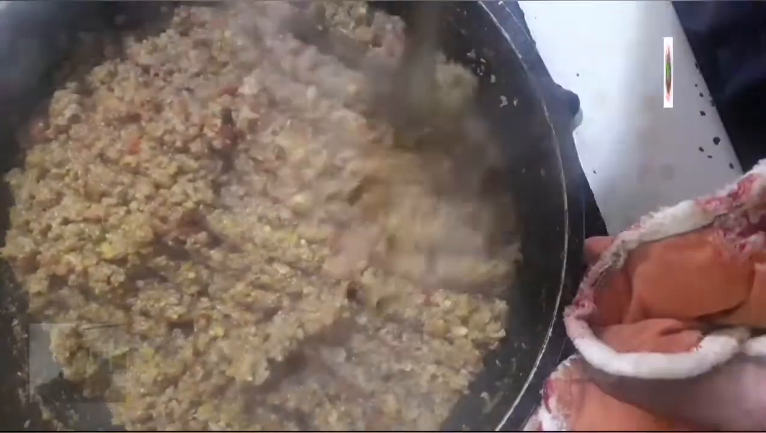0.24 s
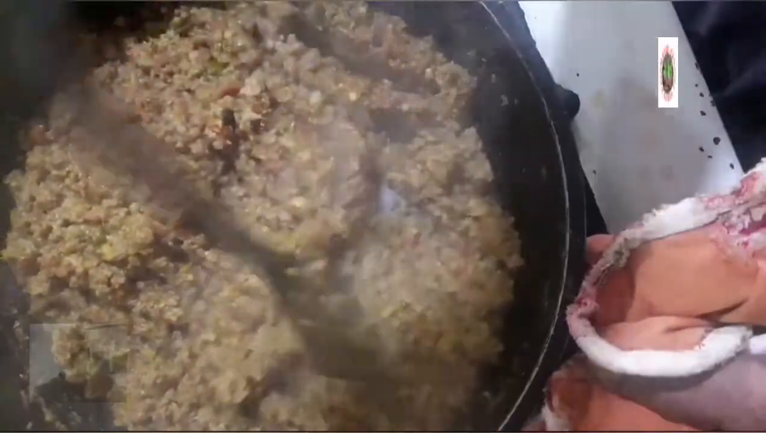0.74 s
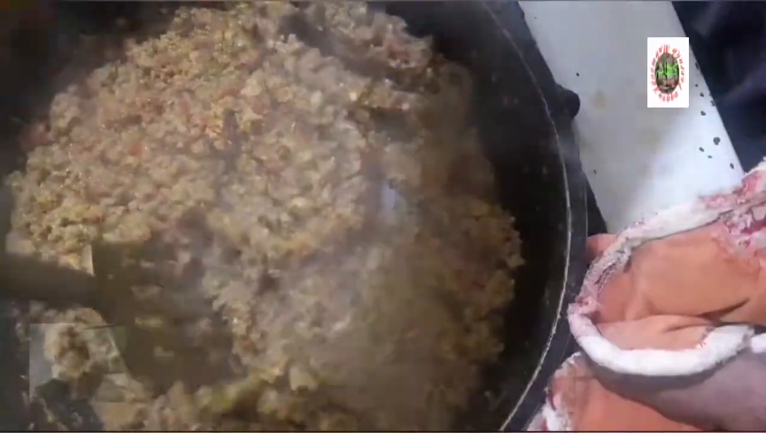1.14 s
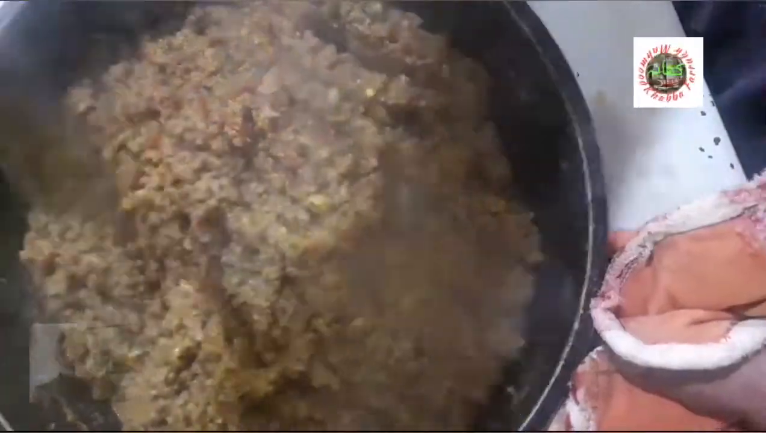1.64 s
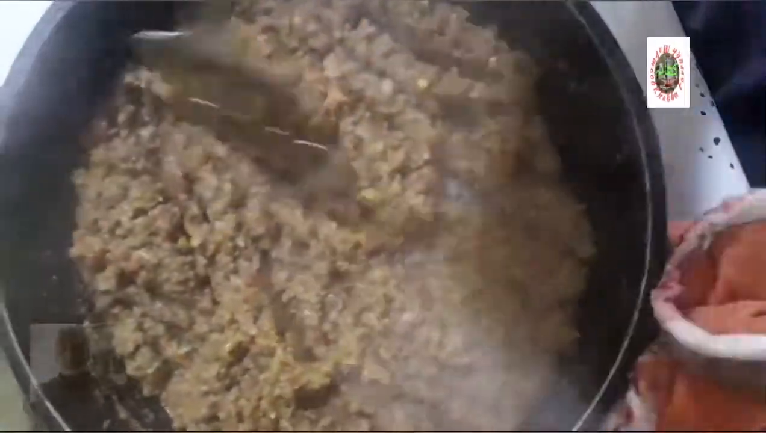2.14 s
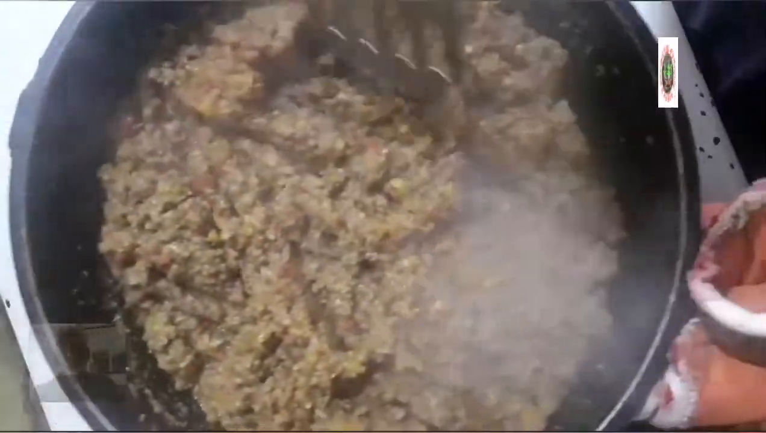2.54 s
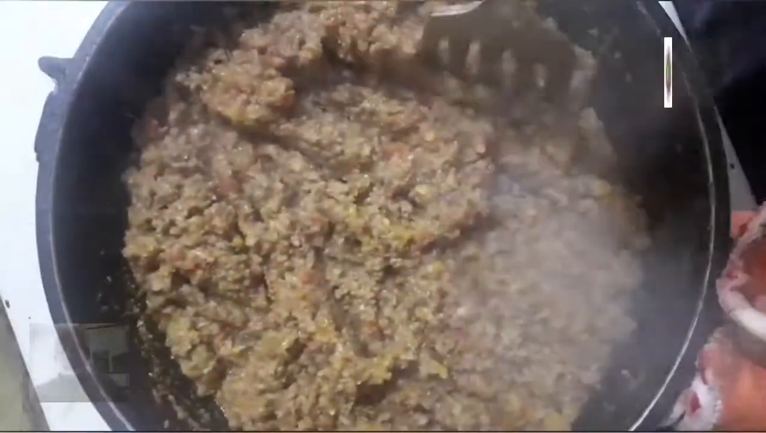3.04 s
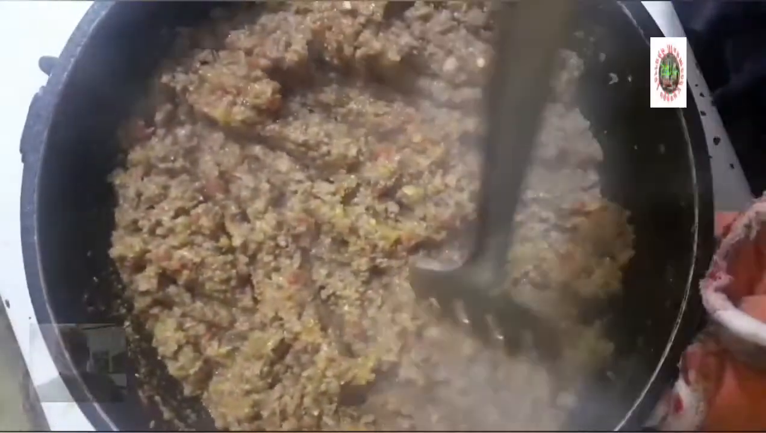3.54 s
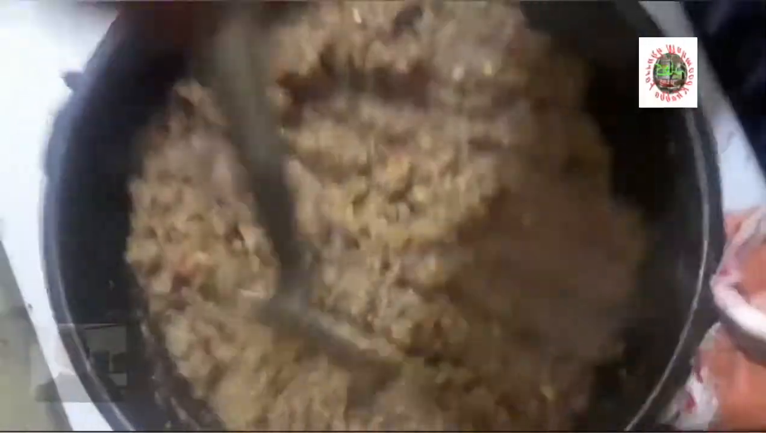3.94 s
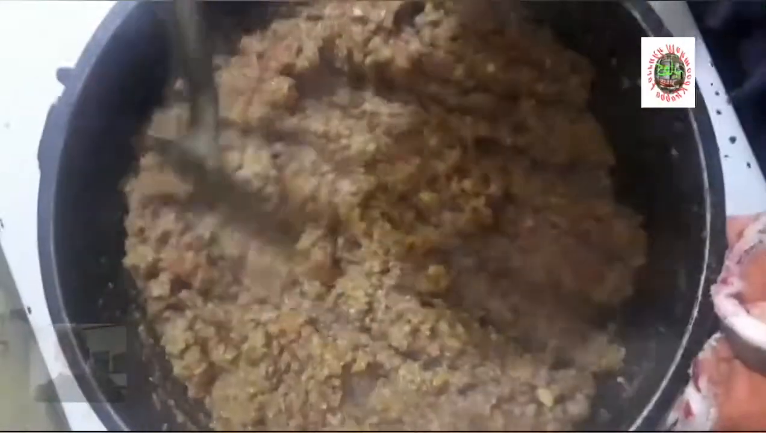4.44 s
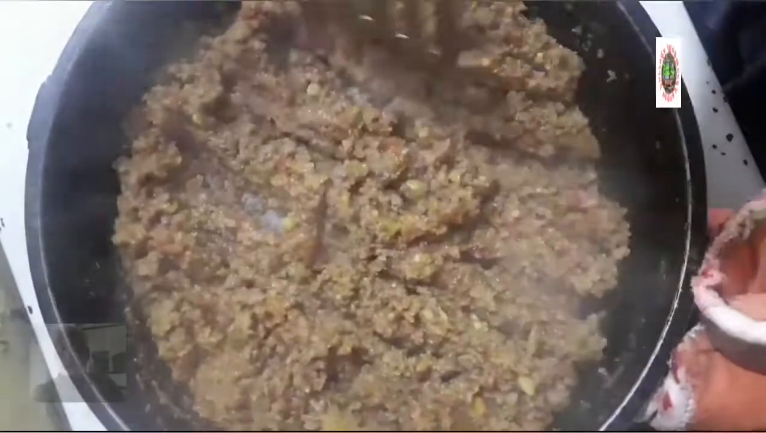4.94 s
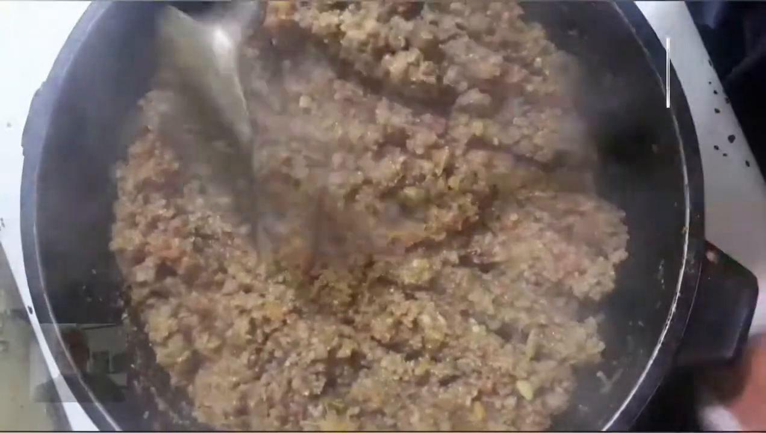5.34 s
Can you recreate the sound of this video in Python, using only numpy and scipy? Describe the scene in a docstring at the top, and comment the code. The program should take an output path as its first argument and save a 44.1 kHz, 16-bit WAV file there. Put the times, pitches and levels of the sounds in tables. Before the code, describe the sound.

Rapid, hard clacks of a steel spatula on an iron pan ring briefly while mince sizzles quietly in a small kitchen.

```python
"""A hard clack of steel on iron, then about five a second: a slotted spatula chops through frying mince.
The stereo microphone is close to the heavy pan, in a small bare kitchen that answers every blow.
Blade and pan ring briefly, the edge skids, and some hard blows rock the pan on the stove.
Underneath, the wet meat squelches and the fat sizzles softly."""
import sys
import numpy as np
from scipy import signal
from scipy.fft import rfft, irfft
from scipy.io import wavfile
from scipy.ndimage import uniform_filter1d

SR = 44100
rng = np.random.default_rng(int(sys.argv[2]) if len(sys.argv) > 2 else 0)


def int16_out(signal):
    """Quantize to a 16-bit WAV file."""
    q = np.round(np.clip(np.atleast_2d(signal).T, -1, 1) * 32767)
    wavfile.write(sys.argv[1], SR, q.astype(np.int16))


N = 247401


def from_db(db):
    """Decibels to gain."""
    return 10 ** (np.asarray(db) / 20)


def unit(x):
    """Scaled to an energy of one."""
    return x / np.sqrt(np.sum(x ** 2) + 1e-20)


def rms_one(x):
    """Scaled to an rms of one."""
    return unit(x) * np.sqrt(x.size)


def at_hz(points, hz):
    """Reads a table on a log-frequency axis."""
    known_hz, values = np.transpose(points)
    return np.interp(np.log(hz + 1e-3), np.log(known_hz), values)


def seconds(length):
    """A time axis."""
    return np.arange(int(length * SR)) / SR


def dying(t, t60):
    """Falls by 60 dB in t60 seconds."""
    return np.exp(-np.log(1000) * t / t60)


def bump(x, width):
    """A bell curve of height one around zero."""
    return np.exp(-(x / width) ** 2)


def add(track, s, sound):
    """Lays a sound into the track at s seconds."""
    start = round(s * SR)
    track[start:start + len(sound)] += sound[:N - start]


def coloured(x, points):
    """Causal (minimum-phase) filter through the given (Hz, dB) points."""
    size = 2048
    gain = from_db(at_hz(points, np.arange(size // 2 + 1) * SR / size))
    cepstrum = irfft(np.log(gain))
    cepstrum[1:size // 2] *= 2
    cepstrum[size // 2 + 1:] = 0
    return signal.fftconvolve(x, irfft(np.exp(rfft(cepstrum))))[:len(x)]


def high_passed(x, hz):
    """Falls by 12 dB an octave below hz."""
    return signal.sosfilt(signal.butter(2, hz, "high", fs=SR, output="sos"), x)


def even(x):
    """Smooths out deep notches in a burst's spectrum; energy one."""
    spectrum = rfft(x)
    return unit(irfft(spectrum / np.abs(spectrum) ** .5, len(x)))


def mode(t, hz, t60):
    """One struck resonance of energy one."""
    return unit(np.sin(2 * np.pi * hz * t) * dying(t, t60)) * rng.choice([-1, 1])


# The bare kitchen around the microphone. Each row: frequency in Hz, t60 in seconds.
KITCHEN_DECAY = [(150, 0.34), (400, 0.53), (1200, 0.37), (3500, 0.31), (8000, 0.27), (15000, 0.18)]
def kitchen(t, build_s=0.009, wall_s=0.021, wall_spread_s=0.013, wall_db=2.0):
    """Diffuse echoes that swell, peak with the nearest wall, and die sooner in the treble; energy one."""
    noise = rfft(rng.standard_normal(len(t)))
    hz = np.arange(len(t) // 2 + 1) * SR / len(t)
    centres, t60s = np.transpose(KITCHEN_DECAY)
    bands = [at_hz(np.column_stack([centres, row]), hz) for row in np.eye(len(centres))]
    tail = sum(irfft(noise * band, len(t)) * dying(t, t60) for band, t60 in zip(bands, t60s))
    wall = from_db(wall_db * bump(t - wall_s, wall_spread_s))
    return unit(tail * (1 - bump(t, build_s)) * wall)


def echoes(sound, t):
    """What the walls send back to the microphone."""
    return signal.fftconvolve(sound, kitchen(t))[:len(t)]


def with_room(sound, t, wet):
    """A ring with its echoes in the kitchen; energy one."""
    return unit(unit(sound) + wet * unit(echoes(sound, t)))


def bubbling(per_s, size_db):
    """Pops of uneven size at random moments; rms one."""
    sizes = from_db(size_db * np.minimum(rng.exponential(1, N), 5)) * rng.standard_normal(N)
    return rms_one(sizes * (rng.random(N) < per_s / SR))


# Tone of the hiss and of the simmer, close to the pan. Each row: frequency in Hz, gain in dB.
SIZZLE_SPECTRUM = [(500, 0), (1000, 0), (1700, 9), (2800, 5), (4000, 8), (7600, 6), (8400, -5),
                   (9800, -5.5), (11600, 1.5), (13500, -4.5), (15500, 0.5), (16200, -23)]
SIMMER_SPECTRUM = [(25, -39), (50, -20), (90, -2.5), (180, -5.5), (260, 0), (420, -3), (650, -12),
                   (1100, -11.5), (2500, -52), (8000, -63)]
# How briskly the meat fries. Each row: time in seconds, hiss level in dB, simmer level in dB.
FRYING_LEVELS = [(0.0, -48.5, -47), (0.37, -50, -48.5), (1.48, -47.5, -44), (1.7, -50.5, -47),
                 (3.08, -52.5, -56), (3.77, -52, -52), (4.28, -51.5, -50.5), (4.69, -49.5, -45.5),
                 (5.34, -53, -53), (5.61, -52.5, -50)]
def frying(simmer_trim_db=-2.0):
    """Countless steam bursts merge into a smooth hiss, while juice simmers deep in the meat."""
    s, *levels = np.transpose(FRYING_LEVELS)
    sizzle_db, simmer_db = [np.interp(np.arange(N) / SR, s, level) for level in levels]
    sizzle = rms_one(coloured(rng.standard_normal(N), SIZZLE_SPECTRUM))
    simmer = rms_one(coloured(bubbling(per_s=900, size_db=-1.5), SIMMER_SPECTRUM))
    return from_db(sizzle_db) * sizzle + from_db(simmer_db + simmer_trim_db) * simmer


# Wet meat squeezed under the blade. Each row: start in seconds, level in dB, middle pitch in Hz.
MEAT_SQUELCHES = [(1.179, -30, 610), (1.37, -27.5, 690), (1.514, -28.5, 370), (1.543, -30.5, 457),
                  (1.56, -40, 366), (4.671, -43, 656), (5.059, -60, 644)]
def squelches(length_s=0.0119, cycles=11, spread=0.3, room_db=-6, count=12):
    """A handful of wet pockets pop, each ringing for a few cycles."""
    out, t = np.zeros(N), seconds(0.23)
    for s, db, hz in MEAT_SQUELCHES:
        delays = rng.random(count) * length_s
        pitches = hz * np.exp(spread * np.linspace(-2, 2, count))
        for delay, pitch in zip(delays, pitches):
            pop = mode(t, pitch, cycles / pitch) * from_db(db) * np.sqrt(length_s * SR / count)
            add(out, s + delay, pop + from_db(room_db) * echoes(pop, t))
    return out


# The pan against the stove beneath it.
# Each row: time of the peak in seconds, level in dB, pitch in Hz, half length in seconds.
PAN_KNOCKS = [(2.0466, -17, 146, 0.0033), (3.4055, -36, 110, 0.0072), (3.777, -30, 129, 0.0043),
              (4.43, -45, 110, 0.0059), (4.817, -13, 135, 0.0029)]
def knocks(room_db=-12):
    """The whole pan bounces once on its support: a low thud of about one cycle."""
    out, t = np.zeros(N), seconds(.5)
    for s, db, hz, half_s in PAN_KNOCKS:
        lead = 2 * half_s   # the push builds up before its peak
        thud = -from_db(db) * np.cos(2 * np.pi * hz * (t - lead)) * bump(t - lead, half_s)
        echo = coloured(echoes(thud, t), [(40, -6), (160, -10.5)])
        add(out, s - lead, thud + from_db(room_db) * echo)
    return out


# Skids across the floor of the pan.
# Each row: start in seconds, length in seconds, level in dB, squeak pitch in Hz.
EDGE_GRAZES = [(0.225, 0.02, -20.5, 4550), (0.407, 0.0081, -32, 5880), (1.672, 0.0092, -23.5, 4570),
               (2.218, 0.0067, -33, 7500), (3.179, 0.012, -33, 6900), (3.588, 0.0035, -16, 5060),
               (4.417, 0.0029, -30, 7300)]
def grazes(squeak_db=-2, room_db=-6, skid_s=.0035, skid_db=-20, skid_hz=6400):
    """The sliding edge hisses and briefly sets a blade mode squeaking."""
    out, t = np.zeros(N), seconds(.5)
    hiss_spectrum = [(300, -5), (4500, -11), (8000, -14.5), (16000, -15)]
    # every blow also skids a little just before it bites
    skids = [(s - skid_s, skid_s, db + skid_db, skid_hz * rng.uniform(0.8, 1.15)) for s, db, *_ in BLOWS]
    for s, length, db, hz in EDGE_GRAZES + skids:
        hiss = rms_one(coloured(rng.standard_normal(len(t)), hiss_spectrum))
        squeak = from_db(squeak_db) * np.sin(2 * np.pi * hz * t)
        stroke = np.sin(np.pi * np.minimum(t / length, 1))
        rub = from_db(db) * stroke * (0.5 * hiss + squeak)
        add(out, s, rub + from_db(room_db) * echoes(rub, t))
    return out


# The blade sings on above the meat. Each row: start in seconds, pitch in Hz, level in dB, t60 in seconds.
BLADE_REBOUNDS = [(3.571, 3350, -37, 0.19), (3.775, 3440, -44, 0.19), (3.954, 3410, -39, 0.17),
                  (4.4183, 4560, -32.5, 0.23), (4.421, 4130, -51, 0.24), (4.419, 1520, -40, 0.047),
                  (5.403, 2850, -48, 0.36), (5.4053, 3400, -33, 0.077), (5.4045, 4860, -43, 0.21)]
def rebounds(split=0.0187, twin_db=-2, room_db=1):
    """Lifted free, the blade is hardly damped; its slots pair the modes, so they beat."""
    out, t = np.zeros(N), seconds(0.71)
    for s, hz, db, t60 in BLADE_REBOUNDS:
        twin = from_db(twin_db) * np.sin(2 * np.pi * hz * (1 - split) * t)
        ring = from_db(db) * (np.sin(2 * np.pi * hz * t) + twin) * dying(t, t60)
        add(out, s, ring + from_db(room_db) * echoes(ring, t))
    return out


# The heavy pan's modes. Each row: frequency in Hz, relative level in dB, t60 in seconds.
PAN_MODES = [(166.1, -30, 0.88), (245.5, -22, 0.26), (365, -19.5, 0.23), (398.6, -20.5, 0.51),
             (476, -21.5, 0.36), (832.5, -17.5, 0.063), (934, -24, 0.43), (949, -26.5, 0.3),
             (1047, -19.5, 0.31), (1215, -32, 1), (1427, -20.5, 0.44), (1840, -22, 0.14),
             (2146, -23.5, 0.19), (3066, -22.5, 0.051), (4260, -66, 0.15), (4830, -39, 0.21),
             (5870, -30, 0.04), (7150, -48, 0.11)]
def pan_ring(t, trim_db=-1, vary_db=2.0, detune=0.0072):
    """The iron rings; the pressing blade and shifting meat nudge each mode's strength and pitch."""
    ring = 0
    for hz, db, t60 in PAN_MODES:
        strength, load = rng.standard_normal(2)
        ring += from_db(db + trim_db + vary_db * strength) * mode(t, hz * (1 + detune * load), t60)
    return ring


# Where the spatula presses on the pan. Each row: mode frequency in Hz, relative level in dB.
PRESSED_MODES = [(917, -19), (1430, -18.5), (1865, -18.5), (2135, -19.5), (3210, -16), (3370, -17.5),
                 (3990, -14.5), (4180, -19), (4515, -16.5), (5650, -20.5), (7550, -12)]
def contact_rings(t, t60, wet, trim_db=-1, spot_db=3, detune=0.0072):
    """Short, strong rings, weighted anew by each spot and angle of contact."""
    rings = 0
    for hz, db in PRESSED_MODES:
        spot, load = rng.standard_normal(2)
        rings += from_db(db + trim_db + spot_db * spot) * mode(t, hz * (1 + detune * load), t60)
    return np.linalg.norm(rings) * with_room(rings, t, wet)


# The blade's upper resonances. Each row: frequency in Hz, height above the valleys in dB.
BLADE_PEAKS = [(4150, 0), (4570, 2), (5050, 6.5), (5630, 4), (6200, 6.5), (6620, 7.5), (7350, 9),
               (7700, 9.5), (8650, 0.5), (9500, 5.5), (10200, 8.5), (10800, 8), (11400, 9.5), (12420, 0),
               (12900, 0)]
def blade_colour(width_hz=130, vary_db=2):
    """Peaks and valleys of the steel blade, weighted anew by every grip and contact: (Hz, dB)."""
    hz = np.arange(40, 16500, 40)
    peaks = sum((db + vary_db * rng.standard_normal()) * bump(hz - centre, width_hz)
                for centre, db in BLADE_PEAKS)
    return np.column_stack([hz, peaks - uniform_filter1d(peaks, size=31)])


# Tone of an average clack at the microphone. Each row: frequency in Hz, gain in dB.
CLACK_SPECTRUM = [(30, -38), (70, -5), (120, -40.5), (170, -1.5), (420, 1), (560, 0.5), (760, -2),
                  (980, 3.5), (1170, 1.5), (1500, -2.5), (2650, -4), (3300, -1.5), (5200, 1), (7700, -6),
                  (8300, -4.5), (16000, -5.5)]
def clack(t, wet, rise_s=0.00078, tick_t60=0.0038, tick_db=8.0, crack_t60=0.0086,
          blade_t60=0.079, blade_db=-10):
    """Steel hits iron: a tick, a crack, the blade's crowded modes and the room; energy one."""
    room = wet * kitchen(t)
    rise = 1 - np.exp(-t / rise_s)
    tick = from_db(tick_db) * dying(t, tick_t60)
    fall = tick + dying(t, crack_t60) + from_db(blade_db) * dying(t, blade_t60)
    burst = even(rng.standard_normal(len(t)) * rise * fall) * (t < t[-1] / 2)
    return unit(coloured(coloured(burst + room, CLACK_SPECTRUM), blade_colour()))


# The pan's hollow note, weak with the spatula near the rim and strong near the middle.
# Each row: time in seconds, gain in dB.
HOLLOW_GAIN = [(0, 0), (0.6, 3), (1.0, -4), (1.85, -3.5), (2.4, -2), (3.2, -1.5), (3.8, 1.5), (5.4, 1)]
def contact_colour(s, tilt, body_db, body_hz=2300, body_octaves=0.85, hollow_hz=930, hollow_octaves=0.33):
    """Meat cushions a blow and tilts it towards the bass; a flat landing fills the middle: (Hz, dB)."""
    hz = np.geomspace(350, 14000, 24)
    octaves = np.log2(hz / body_hz)
    body = body_db * bump(octaves, body_octaves)
    hollow_db = np.interp(s, *np.transpose(HOLLOW_GAIN))
    hollow = hollow_db * bump(np.log2(hz / hollow_hz), hollow_octaves)
    soft_top = at_hz([(6000, 0), (14000, -9.0)], hz)
    return np.column_stack([hz, tilt * octaves + body + hollow + soft_top])


# The spatula comes down, close in front of the microphone. Each row: start in seconds, level in dB,
# tilt in dB per octave (bright on bare iron, dull through meat), body in dB (full when the edge lands
# flat), lower and upper ring pitch in Hz, relative level of each of these rings in dB.
BLOWS = [(0.025, -19.5, 1.5, -2.5, 5440, 6560, -11.5), (0.2469, -10, 0.84, 8, 2110, 3620, -8),
         (0.414, -12.5, 0.4, 5, 1446, 3100, -9.5), (0.5868, -13.5, 0.16, 5.5, 3320, 4080, -9),
         (0.772, -12, 0, 3, 4130, 5415, -29), (0.951, -12, 0.5, 0.5, 1860, 4230, -11.5),
         (1.135, -13, 0.7, 3.5, 1730, 6200, -10.5), (1.324, -11.5, 1.5, 4.5, 1875, 4330, -9),
         (1.501, -13.5, 2.5, 3.5, 2130, 4610, -8.5), (1.6666, -20.5, 2, -13, 6220, 7330, -10),
         (1.847, -15, 0.7, 1, 3870, 7200, -12), (2.0425, -10.5, 1.55, -3, 3240, 4170, -9.5),
         (2.226, -13, 0.5, 0.5, 990, 7160, -10), (2.42, -21, -4.5, 1, 1037, 1070, -4),
         (2.6243, -11, 1.5, 2.5, 3260, 3540, -9), (2.815, -20.2, -1.5, 7.5, 1095, 3880, -8),
         (3.0071, -23, -3, 3.5, 2260, 5280, -8), (3.188, -16.5, -1.5, 5.5, 1464, 2340, -6),
         (3.37, -25.5, -0.5, 9, 3330, 4600, -16), (3.4013, -11, 0.37, 5, 3480, 4800, -13.5),
         (3.5692, -14, 0.15, 3.5, 984, 3360, -9.5), (3.776, -13, 0.2, -0.5, 980, 3310, -8.5),
         (3.9527, -15, 0.1, -3.5, 2030, 3290, -6.5), (4.2331, -37, -1.1, 4.5, 963, 3100, -8),
         (4.4209, -11, -0.4, 2, 1590, 4590, -8.5), (4.622, -27.5, -4.5, -19, 950, 2000, -14),
         (4.8139, -10, 1.8, 0.5, 5760, 7780, -12), (5.001, -19.5, -5.5, 4, 1090, 1484, -7.5),
         (5.4046, -19.5, -0.1, -5.5, 1980, 3280, -9)]
def chops(ring_t60=0.021, ring_trim_db=1, room_db=-3, tail_per_db=0.26):
    """Each blow clacks and sets pan and blade ringing; two short rings stand out."""
    out, t = np.zeros(N), seconds(.4)
    for s, db, tilt, body_db, *ring_hz, ring_db in BLOWS:
        wet = from_db(room_db + tail_per_db * db)   # harder blows leave a fuller tail
        impact = clack(t, wet) + pan_ring(t) + contact_rings(t, ring_t60, wet)
        blow = unit(coloured(impact, contact_colour(s, tilt, body_db)))
        for hz in ring_hz:
            blow += from_db(ring_db + ring_trim_db) * with_room(mode(t, hz, ring_t60), t, wet)
        add(out, s, from_db(db) * unit(blow) * np.sqrt(0.01 * SR))   # level as if packed into 10 ms
    return out


# Stereo width of the blows and of the sizzle. Each row: frequency in Hz, gain of the side signal in dB.
CLACK_SIDE = [(100, -48), (900, -72), (3600, -68), (5200, -54), (7700, -38), (8600, -26), (16000, -12.5)]
SIZZLE_SIDE = [(7300, -46), (8400, -10.5), (16000, -8.5)]
def scene(blade_low_hz=125, meat_low_hz=220):
    """Blows and sizzle are centred, with only the highest treble slightly wide."""
    # the blows and the squelches keep out of the deepest bass
    steel = high_passed(chops() + rebounds() + grazes(), blade_low_hz)
    spatula = steel + knocks() + high_passed(squelches(), meat_low_hz)
    scatter = even(rng.standard_normal(len(seconds(.003))))
    spatula_side = coloured(signal.fftconvolve(spatula, scatter)[:N], CLACK_SIDE)
    side = spatula_side + coloured(frying(), SIZZLE_SIDE)
    return spatula + frying() + side * np.array([[1], [-1]])


def record(dry, low_hz=24, top_hz=15800, ceiling=.95):
    """The small microphone loses the deepest bass; the loudest peaks just overload it; the top is cut."""
    thin = high_passed(dry, low_hz)
    rounded = thin / (1 + (thin / ceiling) ** 6) ** (1 / 6)
    return signal.sosfilt(signal.ellip(10, .1, 80, top_hz, fs=SR, output="sos"), rounded)


dry = scene()
out = record(dry)
int16_out(out)
```